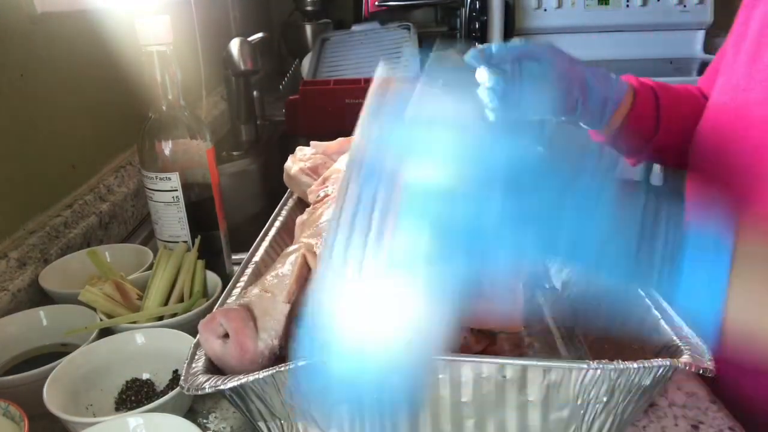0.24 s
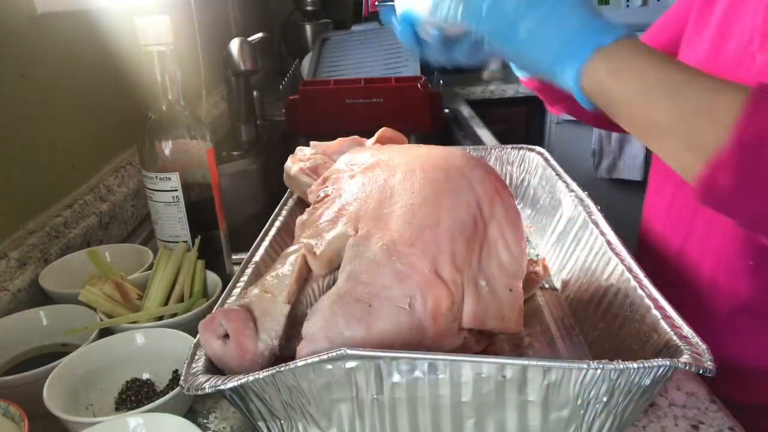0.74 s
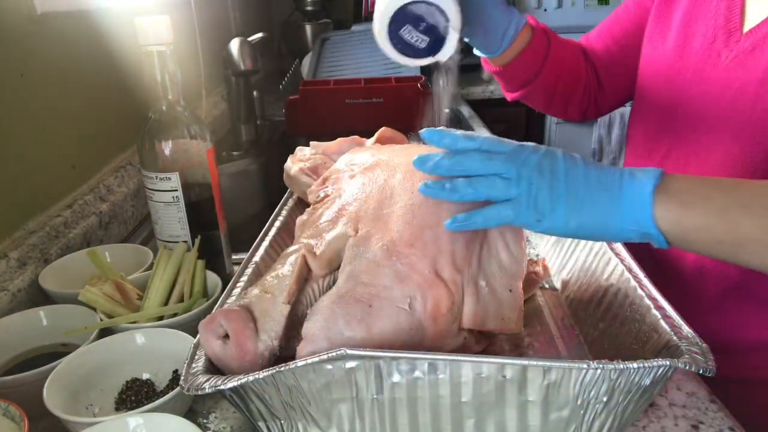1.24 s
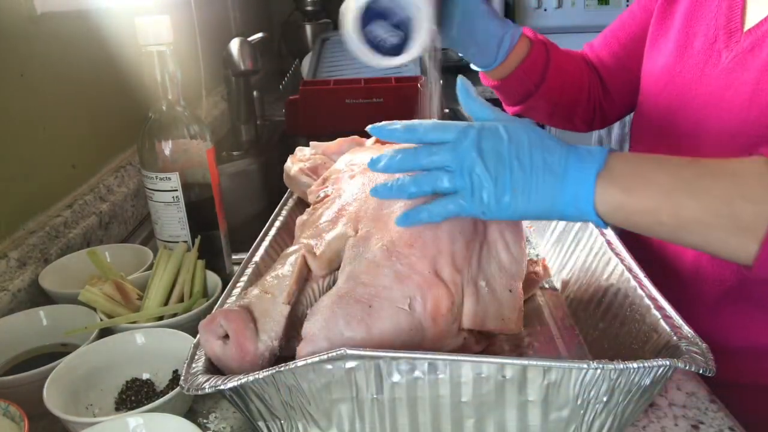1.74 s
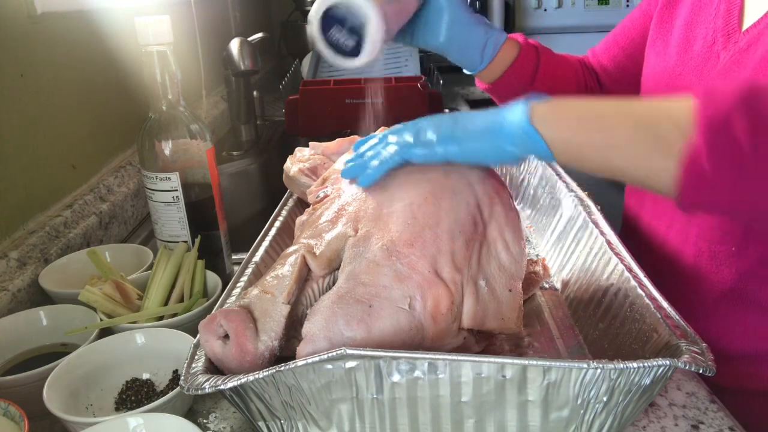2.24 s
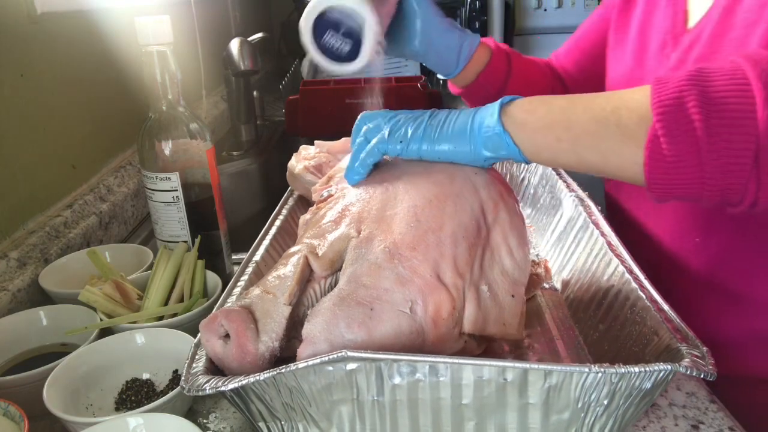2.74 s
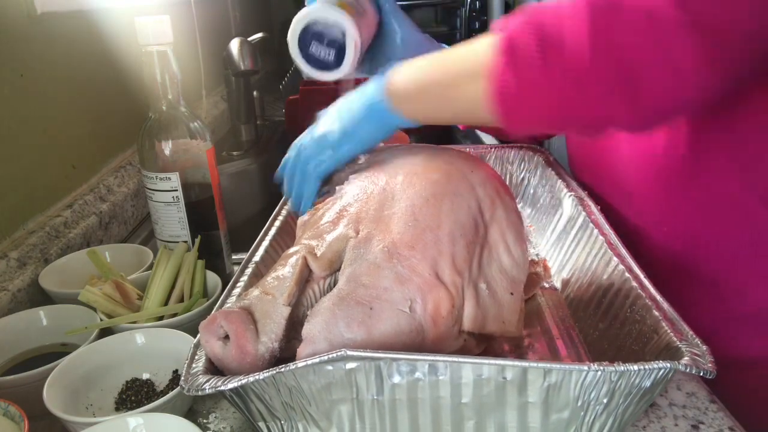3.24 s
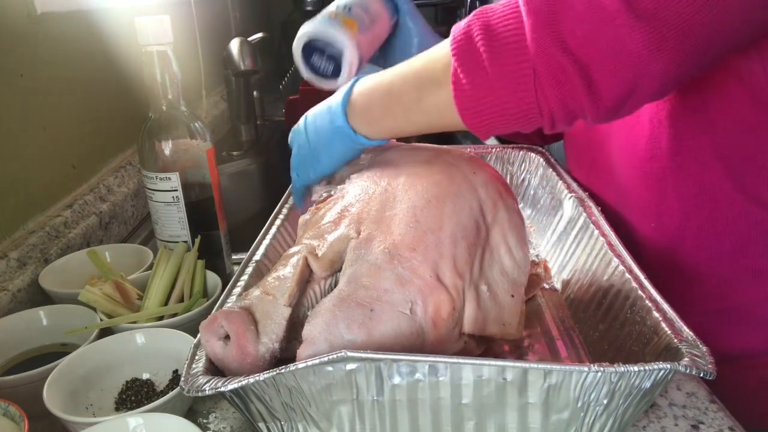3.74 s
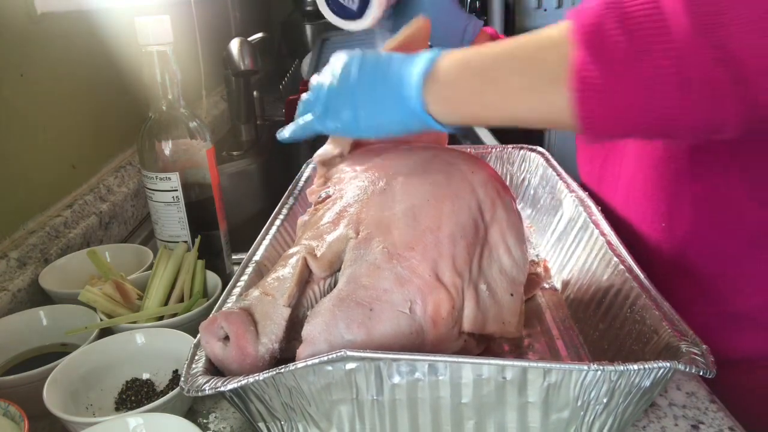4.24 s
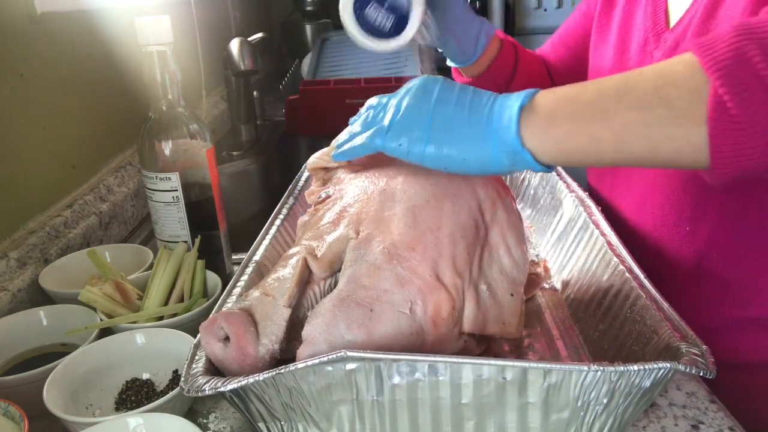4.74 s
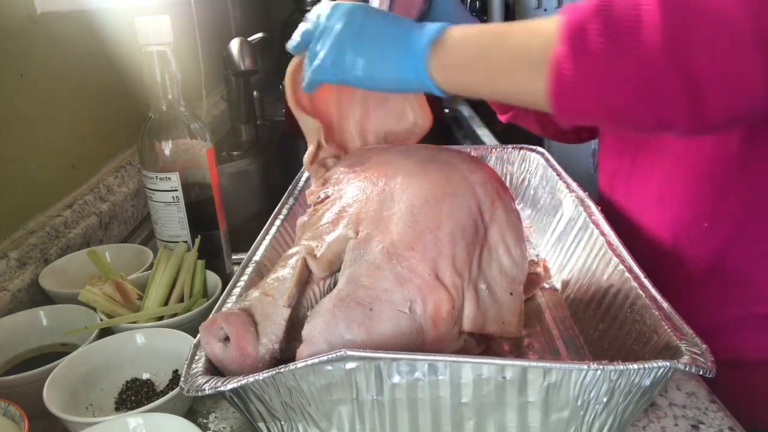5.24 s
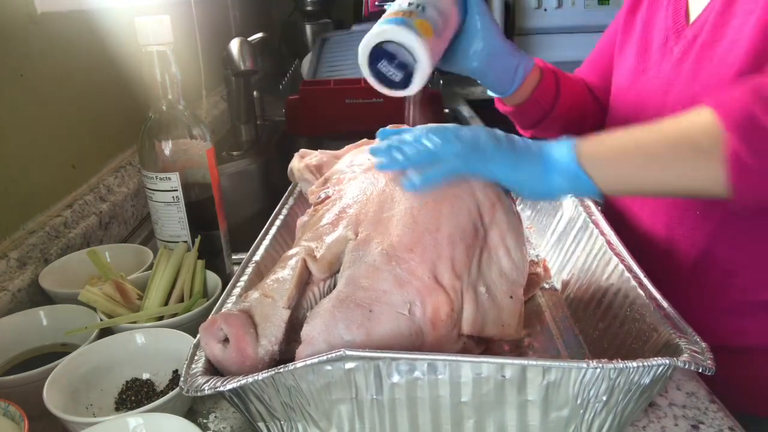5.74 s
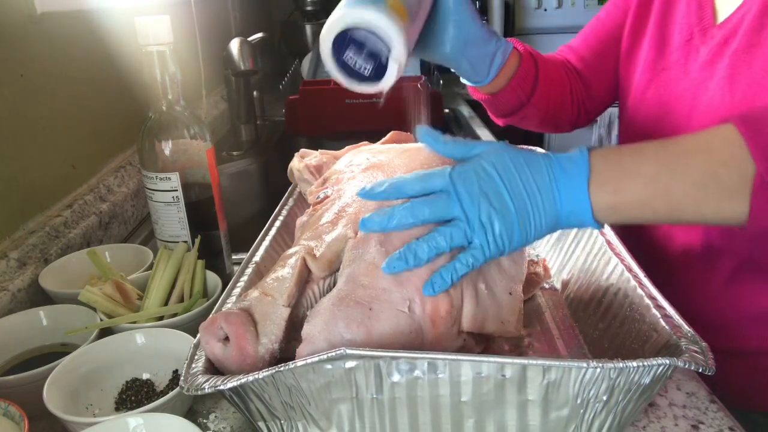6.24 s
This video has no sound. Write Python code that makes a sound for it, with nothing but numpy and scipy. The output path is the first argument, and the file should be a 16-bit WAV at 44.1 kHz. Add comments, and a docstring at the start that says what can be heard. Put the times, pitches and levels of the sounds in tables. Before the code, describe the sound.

A bowl is bumped and rings briefly, then a cardboard salt tub taps into a hand and salt pours with a short hiss. A gloved hand rubs the grains into meat in uneven, gritty strokes, with small crinkles from the glove and a thin foil pan. The pan buckles twice with a hollow knock, the second louder. Everything is close, in a kitchen with a low appliance hum.

```python
"""A bowl is bumped over the hum of a kitchen appliance; then salt hisses onto a joint of pork in a thin
foil roasting pan, countless grains merging into one stream. A gloved hand, first on the salt tub and
then on the meat, rubs it in: the glove sticks and slips, grinding the grains, while creases in glove
and foil crinkle. Twice the meat shifts and the pan buckles with a knock."""
import sys
import numpy as np
from scipy import signal
from scipy.fft import rfft, irfft
from scipy.io import wavfile
from scipy.ndimage import uniform_filter1d

SR = 44100
rng = np.random.default_rng(int(sys.argv[2]) if len(sys.argv) > 2 else 0)


def output_pcm(signal):
    """Save a mono or channel-first signal as 16-bit PCM at the path in sys.argv[1].

    Samples are clipped to [-1, 1] before scaling.
    """
    pcm = np.clip(np.atleast_2d(signal).T, -1, 1) * 32767
    wavfile.write(sys.argv[1], SR, np.round(pcm).astype(np.int16))


N = 285327
TIME = np.arange(N) / SR


def undb(db):
    return 10 ** (np.asarray(db) / 20)


def unit(x):
    """Scale to rms 1."""
    return x / np.sqrt(np.mean(x ** 2))


def at_hz(points, hz):
    """Read (Hz, value) points on a log-frequency axis."""
    f, value = np.transpose(points)
    return np.interp(np.log(hz + 1), np.log(f), value)


def colour(x, points):
    """Minimum-phase EQ that keeps the power of white noise. Each point: frequency in Hz, gain in dB."""
    log_gain = at_hz(points, np.fft.rfftfreq(4096, 1 / SR)) * np.log(10) / 20
    cepstrum = irfft(log_gain)
    cepstrum[1:len(log_gain) - 1] *= 2
    cepstrum[len(log_gain):] = 0
    response = irfft(np.exp(rfft(cepstrum)))
    return signal.fftconvolve(x, response / np.linalg.norm(response))[:len(x)]


def resonate(x, hz, width_hz):
    """Two identical two-pole resonances in series, gain 1 at the centre."""
    peak = signal.iirpeak(hz, hz / width_hz, fs=SR)
    return signal.lfilter(*peak, signal.lfilter(*peak, x))


def add(out, start_s, x):
    """Mix x in at its start time."""
    i = int(start_s * SR)
    out[i:i + len(x)] += x[:N - i]


def walk(turns_per_s):
    """Slow random drift with a spread of about 1."""
    knots = rng.standard_normal(N // 8)
    return 1.22 * np.interp(TIME * turns_per_s, np.arange(len(knots)), knots)


def ring(modes, t):
    """Decaying modes after one blow, alternating in polarity."""
    return sum((-1) ** k * undb(db) * np.sin(2 * np.pi * hz * t) * np.exp(-np.log(1000) * t / t60)
               for k, (hz, db, t60) in enumerate(modes))


def diffuse(t60_scale):
    """A dense tail of energy 1; the low mids ring longest."""
    # Each row: frequency in Hz, T60 in seconds before scaling.
    decays = [(100, 0.15), (700, 0.41), (2000, 0.18), (6000, 0.14), (15000, 0.14)]
    t = np.arange(SR // 2) / SR
    hz = np.fft.rfftfreq(len(t), 1 / SR)
    noise, out = rfft(rng.standard_normal(len(t))), 0
    for centre_hz, t60 in decays:
        share = at_hz([(f, float(f == centre_hz)) for f, _ in decays], hz)
        out += irfft(noise * share, len(t)) * np.exp(-np.log(1000) * t / (t60 * t60_scale))
    return out / np.linalg.norm(out)


def grains(per_s, spread_db):
    """Tiny impacts at random moments; more spread makes a few stand out."""
    sizes = undb(spread_db * np.minimum(rng.exponential(size=N), 5))
    return unit((rng.random(N) < per_s / SR) * sizes * rng.standard_normal(N))


def kitchen(rumble_db, waver_db):
    """Low room rumble and a wavering appliance hum, with a few low tones that swell and fade."""
    # Each row: frequency in Hz, gain in dB.
    rumble_eq = [(10, -55), (22, -29), (36, -0.5), (55, 3), (90, -3), (170, 1.5), (260, -6.5), (400, -9.5),
                 (800, -16), (2000, -18), (6000, -23), (15000, -29)]
    # Each row: frequency in Hz, rms level in dB.
    hum_tones = [(53, -56), (95, -54.5), (140, -55), (199, -55.5), (280, -62)]
    # Each row: crest time in seconds, frequency in Hz, rms level there in dB, half length in seconds.
    low_tones = [(0.354, 140, -42.5, 0.38), (0.45, 59, -44, 0.39), (2.66, 51.25, -44.5, 0.38)]
    rumble = colour(rng.standard_normal(N), rumble_eq) * undb(rumble_db + 0.5 * walk(2.63))
    hum = sum(undb(db + waver_db * walk(3.04)) * np.sin(2 * np.pi * hz * TIME + 0.47 * walk(3.5))
              for hz, db in hum_tones)
    for crest, hz, db, half_length in low_tones:
        swell = undb(db) * np.exp(-((TIME - crest) / half_length) ** 2)
        hum += swell * np.sin(2 * np.pi * hz * TIME + 0.18 * walk(6.7))
    return rumble + np.sqrt(2) * hum


def bowl_bump(ring_db, thud_db):
    """A dull bump sets the bowl ringing, one mode clear above the rest."""
    # Each row: frequency in Hz, relative level in dB, T60 in seconds.
    modes = [(368, -5.5, 0.14), (506, -8, 0.2), (628, 4.5, 0.23), (1090, -34, 0.3), (1160, -16, 0.27),
             (1370, -28, 0.29), (2390, -35, 0.55)]
    thud_eq = [(50, 8), (300, 1.5), (600, -2), (1500, -0.5), (2800, -17.5), (9000, -24), (15000, -26)]
    out, t = np.zeros(N), np.arange(SR // 2) / SR
    thud = colour(diffuse(t60_scale=0.99), thud_eq)
    add(out, 0.001, undb(ring_db) * ring(modes, t) + undb(thud_db) * thud)
    return out


def glove_strokes(attack_s, release_s, resting_db):
    """Level, drag and catch over time, in dB: each stroke takes hold, presses or eases, and lifts."""
    # Each row: start and length in seconds, then in dB: level, its change along the stroke,
    # relative amount of dull drag, catch (the spread of slip sizes).
    strokes = [(0.17, 0.095, -48.5, 0.5, -8, -7), (0.436, 0.028, -44, 9, -7, -2),
               (0.554, 0.15, -48, 2, 0, -7.5), (1.312, 0.11, -37, 1, -5, -5),
               (1.436, 0.17, -30.5, -6, -9.5, 3), (1.612, 0.13, -37, 0, -7, 6.5),
               (1.767, 0.097, -33, 2, -13, 3.5), (1.919, 0.16, -40.5, 4, -6.5, 6.5),
               (2.105, 0.094, -37.5, 3.5, -3, 3), (2.212, 0.14, -38, 2.5, -3.5, 2),
               (2.367, 0.15, -41.5, -4, -2, 6), (2.626, 0.38, -51, -1.5, 0.5, 6.5),
               (2.955, 0.034, -44.5, 3, -4, 4), (3.104, 0.46, -51.5, 9.5, -9, 3),
               (3.342, 0.12, -43, 10.5, -7.5, 6), (3.484, 0.35, -36, -2.5, -6, 1),
               (3.908, 0.1, -43, 0, -6, 9), (4.05, 0.43, -37.5, -0.5, -5.5, 4.5),
               (4.486, 0.13, -42.5, 5.5, -5, 8), (4.667, 0.13, -43, 3, -4, 5),
               (4.858, 0.1, -42.5, 3, -6.5, 8), (4.957, 0.18, -35, 3, -5, 3.5),
               (5.173, 0.23, -33, 4.5, -6, -16), (5.423, 0.49, -30.5, -8.5, -4.5, -15),
               (5.933, 0.13, -38, 7, -10.5, 4), (6.101, 0.073, -33.5, -7, -8, 4),
               (6.256, 0.26, -40, -1.5, -14, 0)]
    power = []
    for start, length, db, change_db, _, _ in strokes:
        t = TIME - start
        envelope = np.clip(t / attack_s, 0, 1) * np.exp(-np.maximum(t - length, 0) / release_s)
        pressure = undb(db + change_db * np.clip(t / length, 0, 1))
        power.append((envelope * pressure) ** 2)
    power = np.array(power) + undb(resting_db) ** 2 / len(strokes)  # the hand is never quite still
    total = power.sum(axis=0)
    drag_db, catch_db = np.array(strokes)[:, -2:].T @ power / total  # the loudest stroke leads
    return 10 * np.log10(total), drag_db, catch_db


def rubbing(level_db, drag_db, catch_db, slips_per_s, slip_s):
    """The glove sticks and lets go; each sharp slip grinds a burst of grains and drags the skin."""
    # Dry grains, then dragged skin. Each row: frequency in Hz, gain in dB.
    grain_eq = [(1500, -14), (3300, -6), (4700, -5.5), (6000, -2), (8300, -4.5), (9600, -4), (10400, -5),
                (11600, 0), (12900, 0), (14200, -3), (15700, -7)]
    skin_eq = [(300, -14), (850, -19), (1250, -2), (1900, -2), (2550, 0.5), (3200, -8.5), (4500, -4),
               (9000, -50)]
    t = np.arange(SR // 40) / SR
    lets_go = rng.random(N) < slips_per_s / SR
    releases = lets_go * undb(2 * catch_db * np.minimum(rng.exponential(size=N), 2.8))
    power = np.abs(signal.fftconvolve(releases, np.exp(-t / slip_s))[:N]) + 1.4  # some always slide
    slips = np.sqrt(power / uniform_filter1d(power, size=2200))
    grind = colour(grains(per_s=14000, spread_db=1.2), grain_eq)
    coarse = signal.sosfiltfilt(signal.butter(2, 8000, fs=SR, output="sos"), grind)
    fine = grind - coarse
    sway_db = 2.8 * walk(70)  # the mix of crystals under the fingers keeps changing
    salt = coarse * undb(sway_db) + fine * undb(-sway_db)
    skin = colour(grains(per_s=8000, spread_db=1.5), skin_eq)
    pressure_db = walk(25)  # the hand never presses evenly
    return (salt + skin * undb(drag_db - 2)) * slips * undb(level_db + pressure_db - 0.5)


def small_creases(level_db, per_s, decay_s, low_hz, high_hz):
    """Rows for crinkling(): lesser creases give way at random, as strong as the stroke bending them."""
    chance = rng.random((int(per_s * N / SR), 2))
    return [(when * N / SR, level_db[int(when * N)], low_hz + pitch * (high_hz - low_hz), decay_s)
            for when, pitch in chance]


def crinkling(lesser_creases, ring_db, best_hz, ring_db_per_octave):
    """A crease in glove or foil gives way in a run of cracks that ring the small facet beside it."""
    # Each row: start in seconds, opening level in dB, facet pitch in Hz, decay time in seconds.
    loud_creases = [(0.2245, -26.5, 5900, 0.0016), (0.7135, -33.5, 4250, 0.0065),
                    (1.315, -28.5, 2460, 0.0074), (1.3464, -26, 2650, 0.0087), (1.378, -24, 5700, 0.0058),
                    (1.513, -24, 3480, 0.01), (1.683, -24, 4350, 0.011), (1.7276, -27.5, 5700, 0.0084),
                    (1.777, -27, 6870, 0.0082), (1.831, -30, 3650, 0.003), (1.942, -31.5, 5630, 0.0029),
                    (1.9625, -32.5, 6090, 0.004), (2.048, -32, 6520, 0.011), (2.463, -32, 5640, 0.0035),
                    (2.7887, -36.5, 4200, 0.0025), (2.877, -38, 2720, 0.012), (3.327, -35.5, 6460, 0.0039),
                    (3.962, -35, 3900, 0.01), (4.064, -33, 2560, 0.0042), (4.102, -26, 2600, 0.011),
                    (4.248, -29.5, 3850, 0.004), (4.285, -26, 6400, 0.003), (4.51, -32.5, 4700, 0.0051),
                    (4.684, -29.5, 2330, 0.0042), (4.73, -23, 4600, 0.002), (4.854, -33, 5060, 0.0075),
                    (4.904, -30.5, 5020, 0.0047), (5.958, -25.5, 6550, 0.0036), (6.084, -26.5, 3770, 0.007),
                    (6.158, -28.5, 3880, 0.0041), (6.239, -30.5, 3930, 0.0028), (6.3334, -21, 3960, 0.0033)]
    # Each row: frequency in Hz, gain in dB.
    crack_eq = [(250, 1), (750, -17), (1400, -4), (3500, 0), (6000, 5.5), (8200, 1), (9600, 7.5),
                (10400, 2), (12800, 8), (15700, -8)]
    out, t = np.zeros(N), np.arange(SR // 14) / SR
    for start, db, hz, decay_s in loud_creases + lesser_creases:
        noise, ripple = rng.standard_normal((2, len(t)))
        fade = np.exp(-t / decay_s)
        cracks = noise * undb(2.5 * ripple) * fade
        facet = unit(resonate(cracks, hz, width_hz=900))
        facet_db = ring_db + ring_db_per_octave * abs(np.log2(hz / best_hz))  # mid sizes ring best
        crinkle = unit(colour(cracks, crack_eq)) + undb(facet_db) * facet
        add(out, start, undb(db) * np.sqrt(np.mean(fade ** 2)) * crinkle)
    return out


def tub_tap(at_s, db, half_length_s):
    """The cardboard salt tub lands in the other hand with a short, dead tap."""
    cardboard_eq = [(80, 5), (250, 1), (1000, -3.5), (1800, -12), (4000, -11), (12000, -19)]
    push = np.exp(-((TIME - at_s) / half_length_s) ** 2) * rng.standard_normal(N)
    return undb(db) * colour(push, cardboard_eq)


def pouring(hollow_hz, hollow_db, slide_at_s, slide_half_s):
    """Grains leaving the spout merge into a hiss; salt sliding down the tub sounds its hollow."""
    # The stream's fader. Each row: time in seconds, level in dB.
    fader = [(0.75, -47), (0.822, -40), (0.866, -38.5), (0.928, -29.5), (1.026, -30.5), (1.064, -26),
             (1.122, -36), (1.208, -35.5), (1.272, -50.5), (1.295, -57)]
    # Each row: frequency in Hz, gain in dB.
    hiss_eq = [(900, -20), (1900, -10), (2800, -8.5), (4900, -7.5), (5700, -2.5), (8500, -3), (9800, 0),
               (10400, -3), (11300, 2), (12800, 2.5), (15600, -5)]
    times, levels = np.transpose(fader)
    gate = uniform_filter1d(1. * ((TIME >= times[0]) & (TIME <= times[-1])), size=400)  # soft edges
    flow = grains(per_s=24000, spread_db=0)
    stream_db = np.interp(TIME, times, levels) + 0.24 * walk(60)
    stream = colour(flow, hiss_eq) * undb(stream_db) * gate
    hollow = unit(resonate(flow, hollow_hz, width_hz=320))
    slide = np.exp(-((TIME - slide_at_s) / slide_half_s) ** 2)
    return stream + hollow * undb(hollow_db) * slide


def pan_buckling(mode_db, crack_db, rattle_db, crack_s, dense_above_hz):
    """The pan buckles with two knocks: a short crack, its modes, the wrinkled sheet's dense ring."""
    # The loaded pan. Each row: frequency in Hz, relative level in dB, T60 in seconds.
    modes = [(81, -1.5, 0.19), (126.6, -5.5, 0.24), (165, -7, 0.31), (198.7, 0.5, 0.19), (332, -5.5, 0.34),
             (366.5, 4, 0.069), (418.3, -4, 0.27), (462, -5.5, 0.36), (549, 13.5, 0.029), (672, 5, 0.11),
             (829, -3.5, 0.23), (870, -17, 0.088), (963, -3, 0.16), (1118, 5, 0.096), (1317, 2, 0.1),
             (1412, 1.5, 0.13), (1462, -1, 0.14), (1510, 0, 0.11), (1870, -25, 0.68), (1970, -13, 0.39),
             (2194, -28, 0.25), (2320, -37, 0.66), (2650, -22, 0.17), (3184, 8.5, 0.11)]
    # Each knock is layered from frequency bands that start together or moments apart.
    # Each row: start in seconds, gain in dB, the band's low and high edges in Hz, ring time scale.
    knock_bands = [(2.5408, -16.5, 3080, 6600, 0.97), (2.5408, -1, 1160, 1610, 0.89),
                   (2.542, -1, 80, 513, .8), (2.5429, -8.5, 1350, 2870, 1), (2.549, -13, 1070, 3200, 1.0),
                   (2.571, -18, 373, 537, 0.75), (5.479, 5, 70, 272, 0.96), (5.483, 0, 1120, 2070, 1),
                   (5.4861, 6, 255, 469, 0.39), (5.487, -15, 2850, 7650, 0.39),
                   (5.487, 0.5, 570, 1080, 0.74), (5.509, 1, 303, 490, 0.57)]
    out, t = np.zeros(N), np.arange(SR // 2) / SR
    body = undb(mode_db) * ring(modes, t)
    sheet = signal.butter(2, dense_above_hz, "highpass", fs=SR, output="sos")  # leaves bass to the modes
    for start, db, low_hz, high_hz, t60_scale in knock_bands:
        crack = rng.standard_normal(len(t)) * np.exp(-t / crack_s)
        rattle = signal.sosfilt(sheet, undb(crack_db) * crack + undb(rattle_db) * diffuse(t60_scale))
        band = signal.butter(3, [low_hz, high_hz], "bandpass", fs=SR, output="sos")
        add(out, start, undb(db) * signal.sosfilt(band, body + rattle))
    return out


def scene():
    """Everything is close and in mono; the kitchen adds a short, soft echo."""
    level_db, drag_db, catch_db = glove_strokes(attack_s=0.018, release_s=0.04, resting_db=-58.5)
    hands = rubbing(level_db, drag_db, catch_db, slips_per_s=330, slip_s=0.005)
    hands += tub_tap(at_s=0.495, db=-27.5, half_length_s=0.0041)
    salt = pouring(hollow_hz=1380, hollow_db=-44, slide_at_s=1.056, slide_half_s=0.022)
    knocks = pan_buckling(mode_db=-19.5, crack_db=5, rattle_db=20.5, crack_s=0.0039, dense_above_hz=142)
    knocks += bowl_bump(ring_db=-19, thud_db=1.5)
    echo = diffuse(t60_scale=1.14)
    background = kitchen(rumble_db=-46.5, waver_db=3)
    creases = small_creases(level_db, per_s=7, decay_s=0.005, low_hz=2640, high_hz=7200)
    near = hands + salt + crinkling(creases, ring_db=-4, best_hz=3700, ring_db_per_octave=-17)
    room = signal.fftconvolve(undb(-8.5) * near + undb(-23.5) * knocks, echo)[:N]
    return (near + knocks + room + background)[None]


def record(dry):
    """Clip at full scale, then cut the top steeply above 15.8 kHz."""
    top_cut = signal.ellip(10, 0.2, 70, 15800, fs=SR, output="sos")
    return signal.sosfilt(top_cut, np.clip(dry, -1, 1))


dry = scene()
out = record(dry)
output_pcm(out)
```